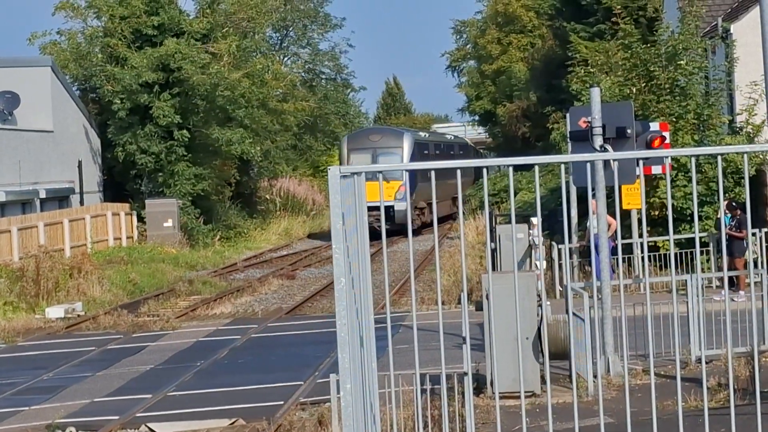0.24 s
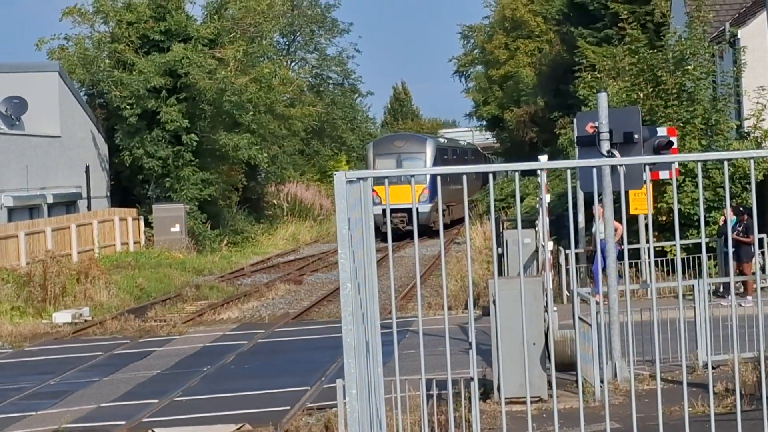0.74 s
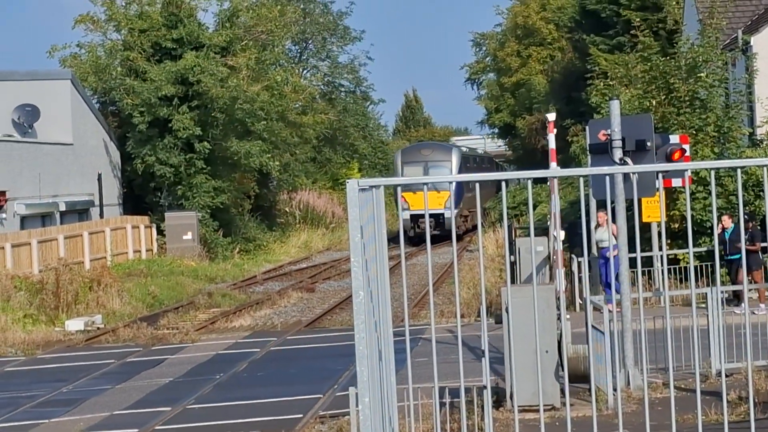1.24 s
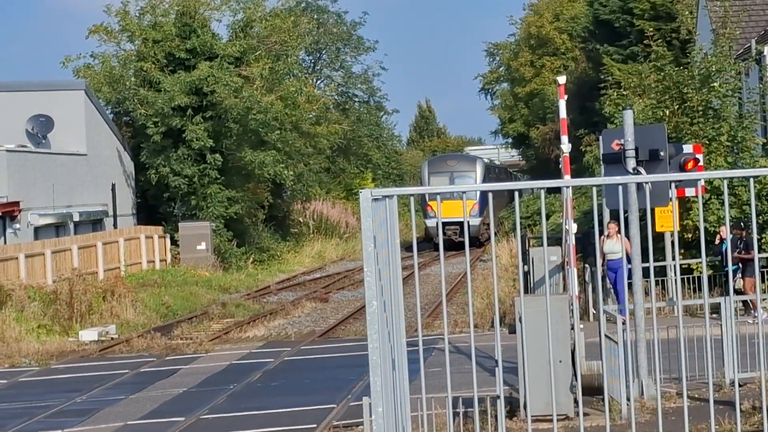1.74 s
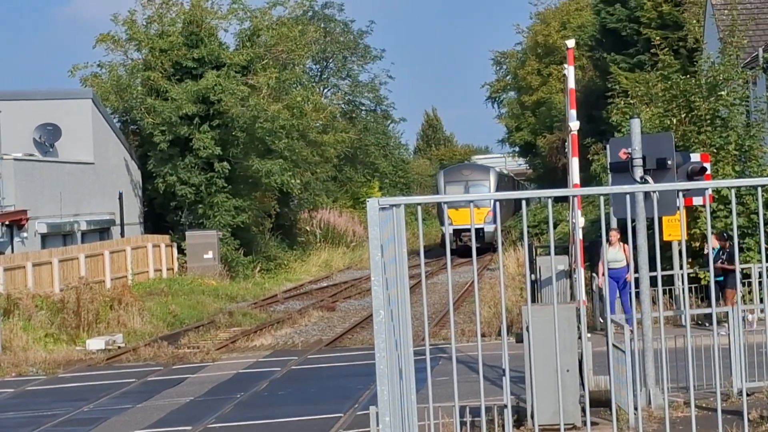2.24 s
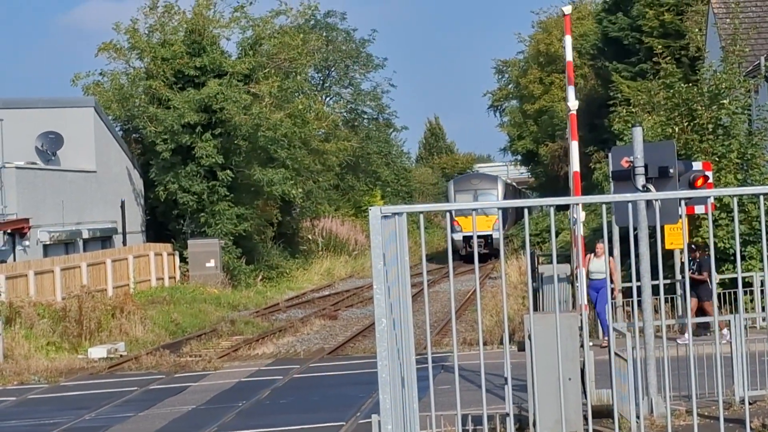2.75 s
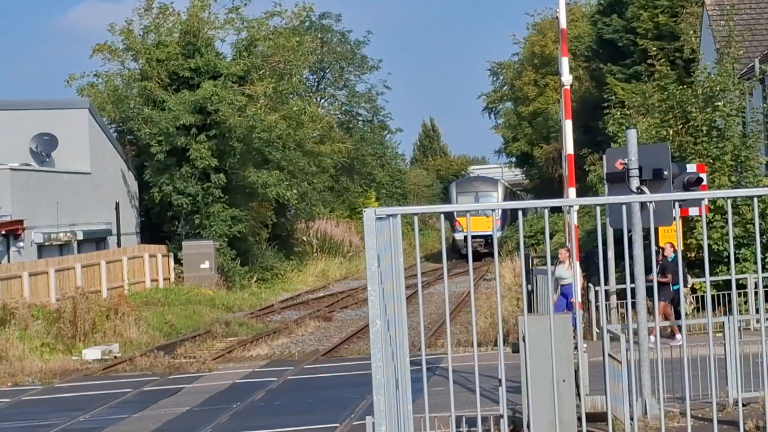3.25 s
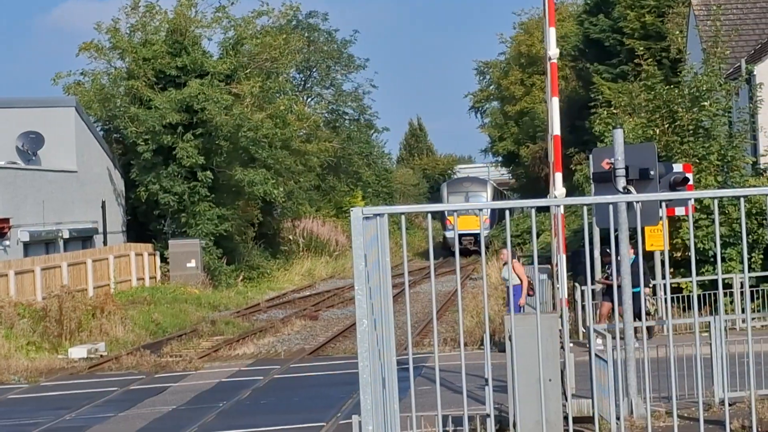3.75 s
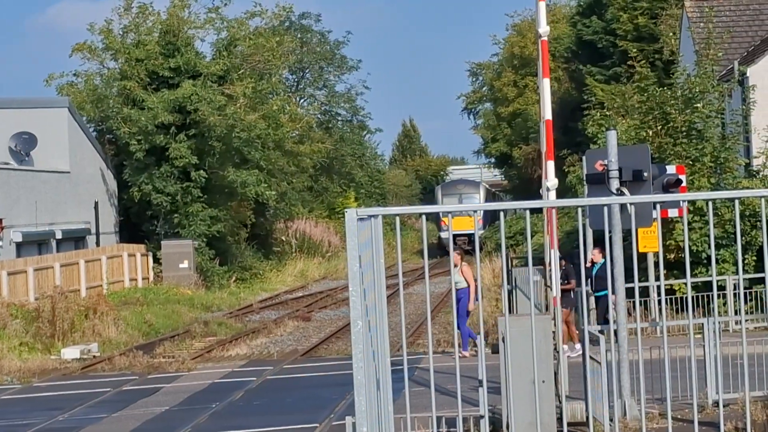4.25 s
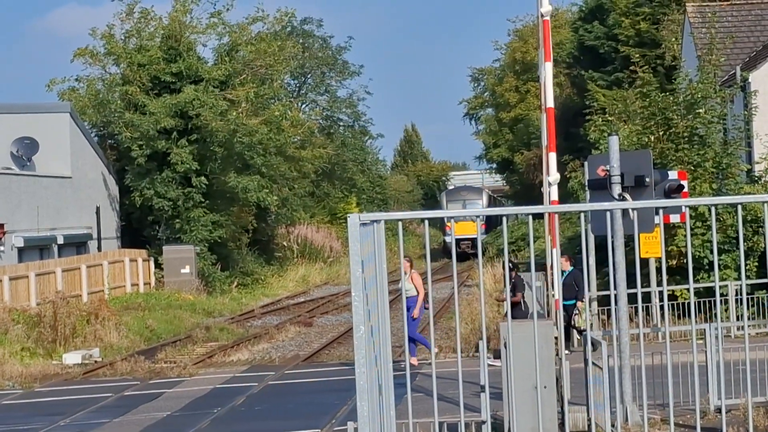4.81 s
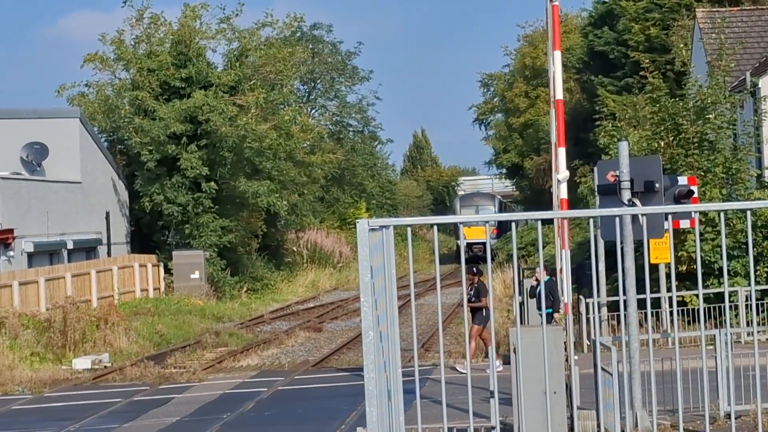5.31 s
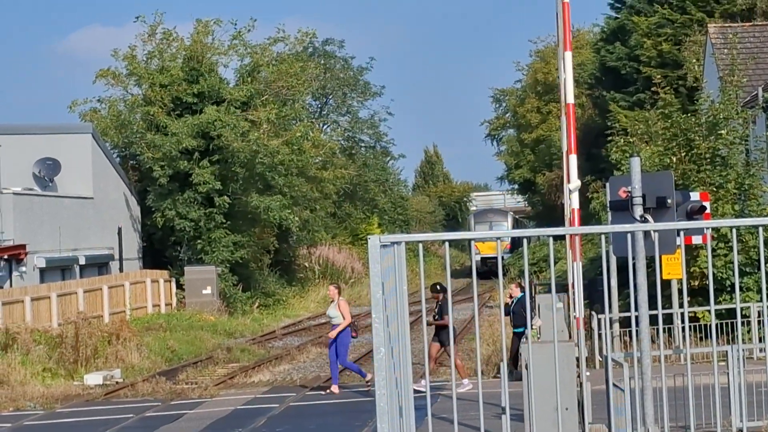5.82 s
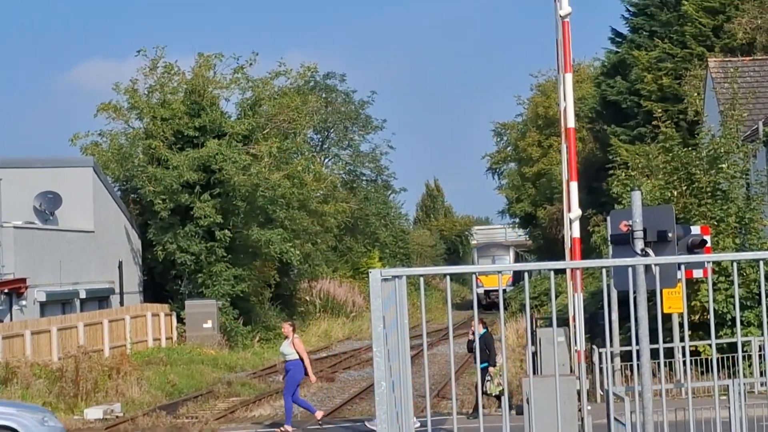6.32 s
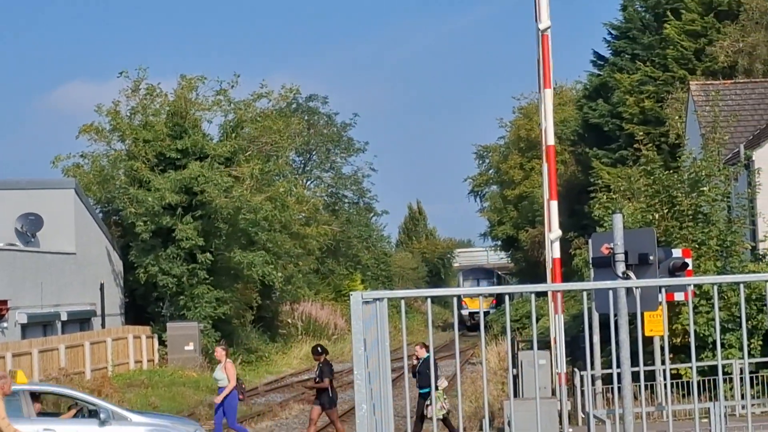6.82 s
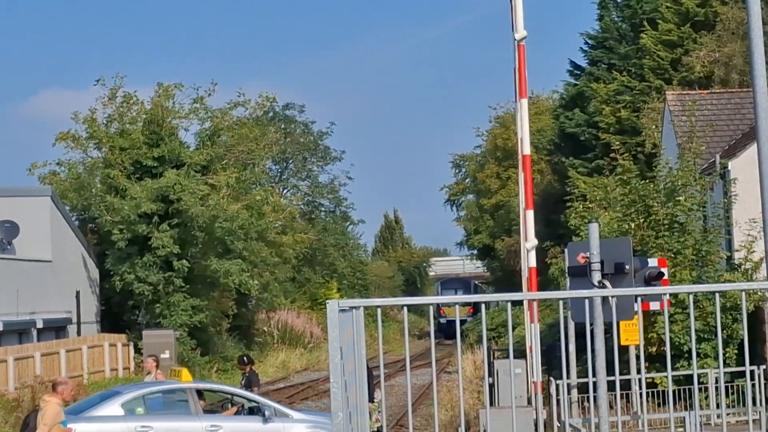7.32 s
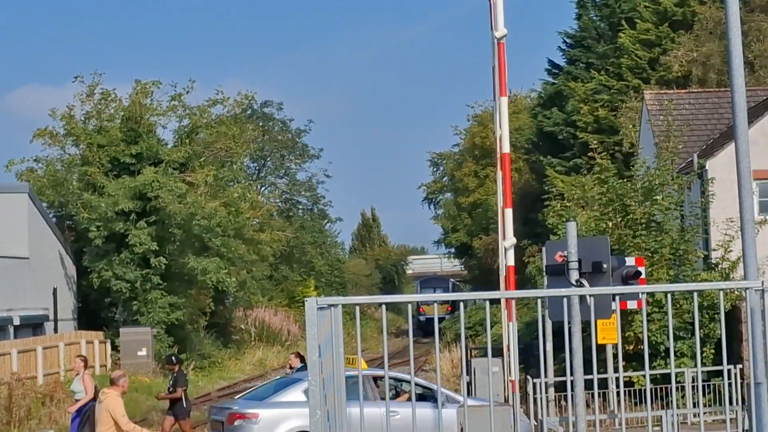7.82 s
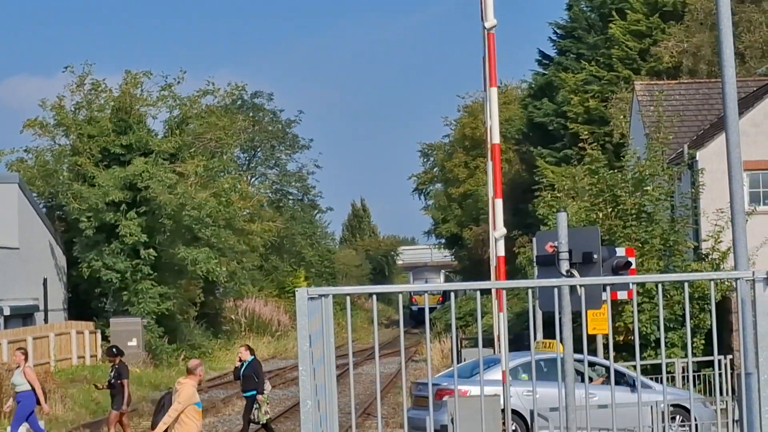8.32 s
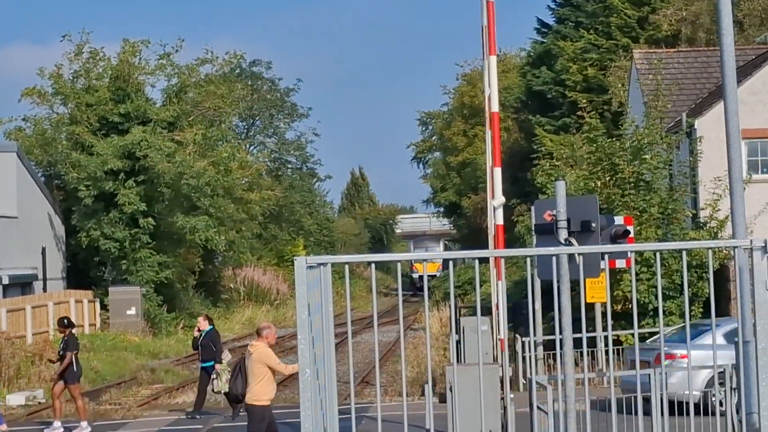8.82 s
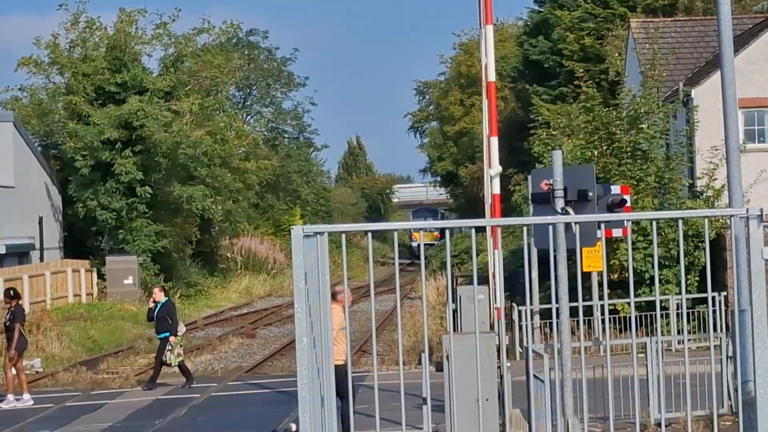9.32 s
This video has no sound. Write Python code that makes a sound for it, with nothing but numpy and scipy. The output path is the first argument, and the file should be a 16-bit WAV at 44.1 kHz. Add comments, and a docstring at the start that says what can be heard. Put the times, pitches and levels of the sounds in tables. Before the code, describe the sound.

Handheld stereo pickup beside a railway crossing. Strong rumble and metallic knocks come first as the train leaves, followed by a fading, beating engine drone with falling squeaks once per wheel turn. A barrier clinks, air vents shortly, and faint very high squeal flickers. Soft wind thumps fill the middle; later, crunchy footsteps cross and a low car engine rises over steady road-like roar.

```python
"""A diesel train throbs and drones away from a level crossing, its wheels knocking over rail joints, squeaking
once a turn and squealing far up; chirps, one vent of air, scuffing walkers, a barrier clink, a bird, wind puffs,
a thin whine and a car join in. Engines are fluttering sine orders; roar, air and grit are coloured noise;
blows are decaying bursts of noise, some through resonances; squeaks, chirps and bird are gliding sines.
Two microphone ports hear most sources a moment apart."""
import sys
import numpy as np
from scipy import signal
from scipy.fft import rfft, irfft, next_fast_len
from scipy.io import wavfile
from scipy.ndimage import uniform_filter1d, map_coordinates

SR = 44100
rng = np.random.default_rng(int(sys.argv[2]) if len(sys.argv) > 2 else 0)


def generate_wav(signal):
    """Clip the signal to [-1, 1] and save it as 16-bit WAV at the path in sys.argv[1]."""
    frames = np.transpose(np.atleast_2d(signal))
    scaled = np.clip(frames, -1, 1) * 32767
    pcm = np.round(scaled).astype(np.int16)
    wavfile.write(sys.argv[1], SR, pcm)


N = 421578

# colour of loose grit, in shoe scuffs and in the barrier's rattle: (frequency [Hz], relative density [dB])
GRIT_COLOUR = [(1760, -24), (3000, -16), (3300, -7), (4240, -2), (11700, -3), (15600, -6.5)]


def amp(db):
    """Decibels to linear gain."""
    return 10 ** (np.asarray(db) / 20)


def unit(x):
    """Scale to an rms of 1."""
    return x / np.sqrt(np.mean(x ** 2) + 1e-20)


def along(points, hz):
    """Read (Hz, value) points at hz, in straight lines on a log frequency axis."""
    point_hz, value = np.transpose(points)
    return np.interp(np.log(hz + 1), np.log(point_hz + 1), value)


def curves(rows):
    """One value per sample for each column after the time."""
    s, *columns = np.transpose(rows)
    return [np.interp(np.arange(N) / SR, s, column) for column in columns]


def gate(rows, fade_s):
    """1 while a table lasts, with short fades inside its ends."""
    t = np.arange(N) / SR
    to_nearest_end = np.minimum(t - rows[0][0], rows[-1][0] - t)
    return np.clip(to_nearest_end / fade_s, 0, 1)


def wobble(rate):
    """A random curve: straight lines between normal random knots, rate of them a second."""
    knots = rng.standard_normal(int(N * rate / SR) + 4)
    return map_coordinates(knots, [np.arange(N) * rate / SR], order=1)


def filtered(x, response):
    """x with its spectrum multiplied by a response of frequency."""
    m = next_fast_len(N + 8192)
    hz = np.fft.rfftfreq(m, 1 / SR)
    return irfft(rfft(x, m) * response(hz), m)[..., :N]


def noise(colour, patchy_db=0):
    """Three unrelated noises of one colour, sharing patches of random gain in time and frequency."""
    z = signal.stft(rng.standard_normal((3, N)), nperseg=512)[2]
    patches = uniform_filter1d(rng.standard_normal(z.shape[1:]), size=5, axis=0)
    patches = uniform_filter1d(patches, size=10, axis=1)
    patchy = signal.istft(z * amp(patchy_db * unit(patches)), nperseg=512)[1][:, :N]
    return unit(filtered(patchy, lambda hz: amp(along(colour, hz))))


def ringing(modes):
    """Three unrelated noises, rms 1, heard through (Hz, width in Hz, dB) resonances."""
    def response(f):
        return sum(amp(db) * 1j * f * width / (centre * centre - f * f + 1j * f * width)
                   for centre, width, db in modes)
    return unit(filtered(rng.standard_normal((3, N)), response))


def tones(hz, spread_hz, rate):
    """Three sines of rms 1 whose pitch flutters, each its own way."""
    drift = np.array([wobble(rate) for _ in range(3)])
    cycles = np.cumsum(hz + spread_hz * drift, axis=1) / SR
    return np.sqrt(2) * np.sin(2 * np.pi * (cycles + rng.random((3, 1))))


def bursts(times, levels_db, t60s, rise_s):
    """Envelope of blows: a quick rise, then an even decay in dB, for up to half a second each."""
    shape, t = np.zeros(N + SR), np.arange(SR // 2) / SR
    for s, db, t60 in np.broadcast(times, levels_db, t60s):
        decay = amp(db - 60 * t / np.clip(t60, .02, 1))
        shape[round(s * SR):][:len(t)] += decay * (1 - np.exp(-t / rise_s))
    return shape[:N]


def glides(notes, sink, stutter, flutter_hz, edge_s):
    """Notes that slide along sink(0-1), fade, and carry a weak octave; all three channels alike."""
    fade_db_per_s, fade_power = 22, 3  # the longer a note lasts, the more it has lost at its end
    out = np.zeros(N)
    for s, length, from_hz, to_hz, db in notes:
        a, b = round(s * SR), min(round((s + length) * SR), N)
        u = np.linspace(0, 1, b - a)
        hz = from_hz + (to_hz - from_hz) * sink(u) + flutter_hz[a:b]
        turn = 2 * np.pi * np.cumsum(hz) / SR
        edges = np.clip(np.minimum(u, 1 - u) * length / edge_s, 0, 1)
        shape = amp(db - fade_db_per_s * length * u ** fade_power) * edges * stutter[a:b]
        out[a:b] += np.sqrt(2) * shape * (np.sin(turn) + amp(-27) * np.sin(2 * turn))
    return np.array([out, out, out])


def straight(u):
    """An even slide from the first pitch to the last."""
    return u


def ports(trio, lag_ms, scattered, pan_db=0):
    """Direct sound reaches the left port earlier by the lag; the scattered share differs from port to port."""
    share = np.clip(scattered, 0, 1)

    def lead_and_lag(hz):
        return np.exp(1j * np.pi * hz * lag_ms / 1000 * np.array([[1], [-1]]))
    pair = np.sqrt(1 - share) * filtered(trio[0], lead_and_lag) + np.sqrt(share) * trio[1:]
    return pair * amp([[pan_db / 2], [-pan_db / 2]])


def engines():
    """Exhaust note of two engines with its octave; their pitch gap makes it beat ever faster."""
    # (time [s], firing rate [Hz], level [dB])
    exhaust_note = [(0.0, 55.1, -25), (1.0, 56.74, -29.5), (1.7, 57.8, -26.5), (2.1, 59.5, -38),
                    (2.7, 60.93, -31), (3.7, 61.05, -44), (4.9, 62.93, -31.5), (5.45, 59.8, -29.5),
                    (5.95, 67.6, -32), (6.3, 71, -31.5), (6.6, 71.4, -65)]
    gap_hz, gap_growth_hz_per_s = 2.08, 0.0667
    cancel_s, depth = 0.452, 0.99  # a moment when the two cancel, and how fully
    hz, db = curves(exhaust_note)
    t = np.arange(N) / SR - cancel_s
    beat_cycles = gap_hz * t + gap_growth_hz_per_s * t ** 2 / 2
    beat = np.abs(1 - depth * np.exp(2j * np.pi * beat_cycles)) / (1 + depth)
    note = tones(hz, spread_hz=1.65, rate=6) + amp(-14.5) * tones(2 * hz, spread_hz=3.26, rate=8)
    return ports(amp(db) * beat * gate(exhaust_note, 0.032) * note, -1.3, 0.11, 0.48)


def drives():
    """Two harmonic drones a little apart in shaft speed; the level of each order throbs."""
    # one list for each drive: (time [s], shaft speed [Hz], level [dB])
    drive_runs = [
        [(0.0, 54.5, -46.5), (0.36, 55.5, -35.5), (0.45, 58, -48), (0.76, 70, -51), (0.85, 70, -38),
         (0.94, 65.5, -45.5), (1.02, 64, -36.5), (1.12, 62.4, -40), (1.45, 65.5, -37), (1.9, 63.6, -39),
         (2.7, 63.1, -41.5), (3.3, 62.9, -49), (4.6, 62.2, -45), (5.3, 61.7, -42), (5.7, 59, -43.5),
         (6.0, 58.5, -52), (6.9, 58, -53)],
        [(0.4, 61.5, -42), (0.55, 62.8, -36.5), (0.74, 62.5, -40), (0.9, 60.8, -45), (1.3, 60.4, -47),
         (2.1, 59.56, -44.5), (2.9, 58.89, -44.5), (3.6, 58.4, -62), (4.8, 57.86, -49), (5.9, 56.8, -42.5),
         (6.95, 55.8, -56)],
    ]
    # (multiple of shaft speed, level in the first drive [dB], level in the second [dB])
    drone_orders = [(2, -16, -5.5), (3, -8.5, -16), (4, -8.5, -18), (5, 0.5, -2), (6, -15.5, -20)]
    out = 0
    for which, rows in enumerate(drive_runs):
        shaft_hz, db = curves(rows)
        orders = 0
        for k, *levels in drone_orders:
            throb = amp(levels[which] + 3.16 * wobble(16))
            orders = orders + throb * tones(k * shaft_hz, spread_hz=1.2, rate=25)
        out = out + amp(db) * gate(rows, 0.025) * orders
    return ports(out, 0.052, 0.15, 0.89)


def rolling():
    """Noise of rolling: low rumble in lumps, the train's roar from ahead, the road's from the side, far hiss."""
    # (time [s], rumble level [dB], train roar level [dB], road roar level [dB], hiss level [dB])
    roll_levels = [(0.0, -26.5, -43, -45, -53.5), (1.13, -37, -45.5, -51.5, -57),
                   (1.66, -34.5, -45.5, -49.5, -55.5), (2.37, -37.5, -46.5, -52, -57),
                   (2.9, -35, -47.5, -49, -53.5), (4.25, -38, -48, -51, -56), (4.76, -34, -48, -49, -52.5),
                   (5.15, -38, -46.5, -46.5, -49), (6.05, -35, -47, -51, -53), (6.79, -37.5, -47, -48, -52),
                   (7.7, -38.5, -44.5, -46.5, -52.5), (8.58, -38, -42.5, -46, -53.5),
                   (8.97, -35.5, -41.5, -46.5, -56), (9.56, -34.5, -43, -48.5, -57)]
    # colours of the four layers: (frequency [Hz], relative density [dB])
    rumble_colour = [(15, -46), (28, -14), (70, -1), (150, -7.5), (290, -11), (360, -26), (500, -74)]
    train_colour = [(200, -46), (330, -1.5), (420, 1.5), (520, -5), (750, -1), (930, -10.5), (1200, -17),
                    (2200, -23), (4500, -33), (9000, -63)]
    road_colour = [(600, -8.5), (1100, 3), (1600, 1), (2050, 3.5), (2600, -3), (3200, -20.5), (4400, -15),
                   (8000, -23), (12000, -49)]
    hiss_colour = [(1760, -8), (3000, -1), (4060, -6.5), (5390, -7), (6820, -13), (9820, -17.5),
                   (15600, -15.5)]
    rumble_db, train_db, road_db, hiss_db = curves(roll_levels)
    lumps_db = 2.86 * wobble(14) + 0.88 * wobble(4.7)
    rumble = amp(rumble_db + lumps_db) * noise(rumble_colour, patchy_db=0.5)
    train = amp(train_db + .7 * wobble(8)) * noise(train_colour, patchy_db=1.93)
    road = amp(road_db + .7 * wobble(8)) * noise(road_colour, patchy_db=1.6)
    hiss = amp(hiss_db) * noise(hiss_colour, patchy_db=2.0)
    near = ports(rumble, 0.031, 0.2) + ports(train, 0.11, 0.24) + ports(road, 0.48, 0.26)
    return near + ports(hiss, 0.311, 1.0)


def joints():
    """Each rail joint gives a dull crash, knocks the sleeper and sets high modes of the rail ringing."""
    # wheels over joints: (time [s], crash level [dB], high ring level [dB], knock level [dB])
    joint_hits = [(0.0294, -45, -60, -58), (0.111, -37, -67, -48), (0.13, -40, -72, -54),
                  (0.152, -32, -75, -60), (0.226, -33, -54, -37.5), (0.265, -50, -71, -47),
                  (0.566, -27, -47, -32), (0.594, -41, -58, -42), (1.48, -37, -73, -46),
                  (1.908, -51, -80, -39), (1.987, -41, -79, -63), (2.3494, -42, -72, -52),
                  (3.243, -44, -67, -59), (3.7494, -52, -69, -41.5), (4.0498, -48.5, -77, -42)]
    # colour of the crash: (frequency [Hz], relative density [dB])
    crash_colour = [(88, -20), (150, -4), (657, -3), (1050, -15), (2110, -1.5), (3360, -11), (9970, -42),
                    (11200, -60), (13600, -42), (15600, -68)]
    # resonances of the sleeper, the rail, and the last bogie grinding over the points:
    # (frequency [Hz], width [Hz], relative level [dB])
    sleeper_modes = [(665, 54, 6), (776, 60, -1.5), (1210, 93, -6), (2130, 110, -17)]
    rail_modes = [(10000, 250, 1), (13300, 300, -4), (6900, 160, -15)]
    scrape_modes = [(1300, 400, -5), (2100, 500, 0), (2750, 250, -2), (3850, 400, -9)]
    crash_t60_s, knock_t60_s, ring_t60_s, scrape_t60_s = 0.19, 0.42, 0.53, 0.48
    s, crash_db, ring_db, knock_db = np.transpose(joint_hits)
    clatter = amp(2.5 * wobble(700) + .8 * wobble(130))
    crash = bursts(s, crash_db, crash_t60_s, 0.0019) * clatter * noise(crash_colour, patchy_db=1.0)
    knock = bursts(s, knock_db, knock_t60_s, 0.0025) * ringing(sleeper_modes)
    ring = bursts(s, ring_db, ring_t60_s, 0.021) * ringing(rail_modes)
    grind = bursts(0.11, -35, scrape_t60_s, 0.052) * clatter * amp(2.5 * wobble(94))
    return ports(crash + knock + ring + grind * ringing(scrape_modes), 0.14, 0.4)


def squeaks():
    """Stick-slip tones, once a wheel turn, that jump between rings of the wheel, sink and stutter."""
    # (start [s], length [s], first pitch [Hz], last pitch [Hz], level [dB], level of the catch before it [dB],
    #  tail length [s], tail first pitch [Hz], tail last pitch [Hz], tail level [dB])
    wheel_squeaks = [(0.714, 0.418, 4960, 4480, -47, -48.5, 0.03, 3950, 3780, -58),
                     (1.97, 0.425, 4950, 4520, -49.5, -48.5, .035, 3960, 3820, -60),
                     (3.449, 0.19, 4800, 4580, -47.5, -47.5, 0.19, 4680, 3800, -57),
                     (4.853, 0.31, 4900, 4650, -51, -46, .076, 4087, 3950, -53.5),
                     (6.02, 0.39, 4960, 4680, -54, -52, .05, 4040, 3850, -54),
                     (7.542, 0.18, 4920, 4800, -50, -53, .19, 4230, 4000, -56),
                     (9.173, .26, 4740, 4500, -52.5, -58, 0.1, 3980, 3846, -58)]
    # lowest ring of the wheel: (start [s], length [s], level [dB])
    low_rings = [(0.11, 0.051, -46), (0.62, 0.11, -52), (1.826, 0.125, -53), (3.33, 0.096, -59)]
    low_hz = 2830
    catch_s, catch_hz, catch_rise_hz = .04, 4150, 130  # a lower ring catches just before
    tail_gap_s, edge_s = .012, .007  # another lower ring ends it after the gap
    even_share, drop_power = 0.49, 6.3  # this share of the sinking is even, the rest drops at the end

    def late_drop(u):
        return even_share * u + (1 - even_share) * u ** drop_power

    short = [(s, length, low_hz, low_hz, db) for s, length, db in low_rings]
    for s, length, _, _, _, catch_db, tail_s, tail_from_hz, tail_to_hz, tail_db in wheel_squeaks:
        short.append((s - catch_s, catch_s, catch_hz, catch_hz + catch_rise_hz, catch_db))
        short.append((s + length + tail_gap_s, tail_s, tail_from_hz, tail_to_hz, tail_db))
    slip = wobble(70)
    dropout_db = np.linspace(6, 11, N) * np.clip(-slip - .6, 0, 2)  # brief drop-outs that deepen with time
    flutter_hz = 34 * wobble(350)
    main_notes = [row[:5] for row in wheel_squeaks]
    held = glides(main_notes, late_drop, amp(2.5 * slip - dropout_db), flutter_hz, edge_s)
    jumps = glides(short, straight, amp(2.7 * slip), flutter_hz, edge_s)
    return ports(held + jumps, 0.071, 0, -1.4)


def chirps():
    """Short rough whistles from the valve and brake gear: sliding sines that stutter and flutter."""
    # (start [s], length [s], first pitch [Hz], last pitch [Hz], level [dB])
    whistles = [(.165, 0.07, 2850, 2800, -49), (.155, .048, 4950, 4900, -53), (.15, .035, 2110, 2050, -43),
                (1.988, .035, 1980, 1965, -48), (1.995, .04, 2620, 2540, -51),
                (2.855, 0.075, 2130, 1930, -46), (2.845, .04, 2480, 2280, -48),
                (2.935, .055, 1740, 1900, -51), (2.97, .055, 2950, 3060, -51),
                (3.038, 0.05, 1960, 1900, -45), (3.228, .03, 1650, 1620, -48), (3.27, .05, 2150, 2020, -52),
                (3.425, 0.045, 1995, 1880, -46.5), (3.42, .035, 1720, 1650, -50)]
    stutter, flutter_hz = amp(2.5 * wobble(120)), 45 * wobble(300)
    return ports(glides(whistles, straight, stutter, flutter_hz, edge_s=0.007), 0.44, 0, -1.7)


def walkers():
    """Shoes on the road: the sole scuffs, then grit crunches under it, over a duller thud."""
    # (time [s], grit level [dB], thud level [dB], thud decay by 60 dB [s])
    footfalls = [(1.0301, -58, -52.5, 0.15), (3.78, -56, -36, 0.087), (6.0377, -57, -42, 0.11),
                 (6.549, -52, -58, 0.09), (6.588, -43, -44, 0.22), (6.6947, -47, -52, 0.12),
                 (6.72, -47, -45.5, 0.13), (6.877, -58.5, -34, 0.061), (7.132, -44.5, -32, 0.27),
                 (7.432, -39, -43, 0.14), (7.865, -63, -39.5, 0.14), (8.124, -40, -48, 0.16),
                 (8.4123, -51, -39, 0.16), (9.1302, -57, -37, 0.23)]
    # colour of the thud: (frequency [Hz], relative density [dB])
    thud_colour = [(400, -27), (750, 14), (1200, -5), (2200, 4.5), (4000, -6.5), (6000, -15.5)]
    scuff_lead_s, scuff_db = 0.061, -12  # the scuff comes ahead of the step, this far under its grit
    s, grit_db, thud_db, t60 = np.transpose(footfalls)
    crunch = amp(6 * wobble(900))
    # grit dies sooner than the thud
    grit = bursts(s, grit_db, 0.84 * t60, .005) * crunch * noise(GRIT_COLOUR, patchy_db=5.0)
    scuff = bursts(s - scuff_lead_s, grit_db + scuff_db, 0.32, 0.02) * crunch * noise(GRIT_COLOUR, patchy_db=4)
    thud = bursts(s, thud_db, t60, 0.0022) * noise(thud_colour)
    return ports(grit + scuff + thud, 0.4, 0.93)


def barrier():
    """A loose bar of the rising barrier clinks once: a short rattle through its modes, with gritty noise."""
    # (frequency [Hz], width [Hz], relative level [dB])
    bar_modes = [(2630, 51, 6), (6410, 59, -2), (7400, 60, -4), (9460, 45, -8)]
    rattle = ringing(bar_modes) + amp(-8) * noise(GRIT_COLOUR)
    clink = bursts([1.575], [-39.5], 0.25, 0.0033)
    return ports(clink * rattle, 0.13, 0.93, -1.1)


def wind():
    """Single pushes of air on the ports, about one low cycle each, and weaker ones at random."""
    # (time [s], peak level [dB])
    pushes = [(2.252, -19.5), (2.899, -21), (3.301, -21), (3.745, -22), (3.818, -23.5), (3.967, -18),
              (4.047, -23), (4.438, -17.5), (4.592, -20), (5.124, -19), (5.404, -20), (7.193, -26),
              (7.257, -28), (7.632, -23)]
    weak_db, base_hz = -28, 74  # middle level of the weak ones; each push scatters around the base pitch
    s, db = np.transpose(pushes)
    chance = rng.random((70, 2))
    s = np.r_[s, 1.8 + 5.9 * chance[:, 0]]
    db = np.r_[db, weak_db - 8 * (chance[:, 1] - .5)]
    out, t = np.zeros((3, N + SR)), np.arange(-SR // 20, SR // 20) / SR
    for at, level, (pitch_chance, *turn) in zip(s, db, rng.random((len(s), 4))):
        f = base_hz * (0.87 + 0.5 * pitch_chance ** 2)
        cycle = np.cos(2 * np.pi * (f * t + np.array(turn)[:, None]))
        push = np.exp(-(t * f / 0.5) ** 2) * cycle
        out[:, round(at * SR) - SR // 20:][:, :len(t)] += amp(level) * push
    return ports(out[:, :N], 0, .46)


def bird():
    """A far bird's faint chips: short sliding sines, most of them falling."""
    # (start [s], length [s], first pitch [Hz], last pitch [Hz], level [dB])
    chips = [(1.825, .016, 6150, 5600, -60), (1.845, .016, 6150, 5650, -60), (1.87, .065, 5700, 5700, -64),
             (4.69, .08, 6450, 5300, -63)]
    stutter, flutter_hz = amp(2 * wobble(90)), 40 * wobble(250)
    return ports(glides(chips, straight, stutter, flutter_hz, edge_s=.004), 0.14, 0)


def vent():
    """A valve lets compressed air out; each resonance of its body flares up in its own time."""
    # resonances of the valve body: (frequency [Hz], width [Hz], relative level [dB])
    valve_modes = [(1820, 95, -11), (2010, 130, -8), (2470, 270, -3), (3005, 130, -11), (3750, 120, -5),
                   (4640, 112, -14), (5540, 300, -4), (6500, 330, -5), (10400, 200, -11.5),
                   (13400, 300, -10)]
    # colour of the rushing air: (frequency [Hz], relative density [dB])
    air_colour = [(530, -42), (900, -10.5), (1630, -10.5), (1950, -2.5), (3340, -14), (6680, -16),
                  (7990, -22.5), (13500, -30), (15600, -26)]
    # short spits after the valve shuts: (time [s], level [dB])
    late_spits = [(3.225, -53), (3.424, -59)]
    open_s, hold_s = 2.825, 0.31
    level_db, sag_db = -43, 1  # pressure sinks by the sag while the valve stays open
    whistle = sum(amp(db + 2.8 * wobble(40)) * ringing([(hz, width, 0)]) for hz, width, db in valve_modes)
    rush = amp(3.5 * wobble(350) + 1.5 * wobble(40)) * noise(air_colour, patchy_db=3.5)
    t = np.arange(N) / SR - open_s
    shut_db = 120 * np.clip(t - hold_s, 0, 1)
    flow = amp(level_db - sag_db * t / hold_s - shut_db) * np.clip(t / 0.024, 0, 1)
    spits = bursts(*np.transpose(late_spits), 0.21, .008) * whistle
    return ports(flow * (rush + amp(-8.5) * whistle) + spits, 0.427, 0.88, -1.04)


def squeal():
    """A flange sings unsteadily in short fits near the top of hearing; the louder, the rougher."""
    # (start [s], hold [s], pitch [Hz], level [dB])
    squeal_fits = [(3.159, 0.14, 14050, -62), (3.3, 0.33, 14030, -57), (3.88, .025, 14030, -50),
                   (4.1, 0.1, 14200, -64), (4.24, .05, 14080, -62), (4.43, 0.08, 14000, -60),
                   (4.7, 0.07, 14100, -61), (5.045, .008, 14000, -55), (5.5, 0.094, 14030, -51),
                   (7.295, .01, 14150, -66), (8.02, .07, 13950, -68)]
    rise_s, fall_s = 0.042, 0.075  # time for 20 dB up and down
    sag_hz_per_s = 300
    t = np.arange(N) / SR
    s, hold, hz, db = np.transpose(squeal_fits)[:, :, None]
    rise_db = 20 * np.clip(s - t, 0, 1) / rise_s
    fall_db = 20 * np.clip(t - s - hold, 0, 1) / fall_s
    fits = amp(db - rise_db - fall_db)
    gain = fits.sum(axis=0)
    # the louder fit pulls the pitch its way
    pitch = (fits * (hz - sag_hz_per_s * np.clip(t - s, 0, 1))).sum(axis=0) / gain
    spread_hz = 55 + 90 * gain / gain.max()
    chatter = amp(5 * wobble(50))
    return ports(gain * chatter * tones(pitch, spread_hz, rate=200), 0.12, 0.25, 3.4)


def whine():
    """A faint, thin, narrow tone that wavers in pitch and flickers in level."""
    # (time [s], level [dB])
    whine_levels = [(3.3, -69), (4.08, -60.5), (4.25, -70), (4.65, -65), (5.2, -77), (6.5, -69), (6.6, -62),
                    (7.03, -57), (7.15, -76), (9.56, -76)]
    flicker = amp(3.5 * wobble(45))
    tone = flicker * tones(np.full(N, 4310.), spread_hz=130, rate=300)
    return ports(amp(curves(whine_levels)[0]) * gate(whine_levels, .1) * tone, 0.28, 0.51)


def car():
    """Low orders of a car engine, fluttering sines at multiples of its shaft speed."""
    # (time [s], shaft speed [Hz], level [dB])
    car_run = [(7.5, 27.5, -49), (7.7, 27.03, -38), (7.95, 26.38, -41), (8.15, 26.49, -54),
               (8.45, 26.7, -47), (8.6, 26.92, -37.5), (9.2, 28.1, -34.5), (9.56, 27.9, -42)]
    # (multiple of shaft speed, relative level [dB])
    car_orders = [(2, -5.5), (3, -2.5), (4, -3.5), (6, -9.5), (8, -11)]
    hz, db = curves(car_run)
    orders = sum(amp(level + 1.3 * wobble(8.4)) * tones(k * hz, spread_hz=1.553, rate=8)
                 for k, level in car_orders)
    return ports(amp(db) * gate(car_run, 0.076) * orders, -0.21, 0.058, 0.77)


def scene():
    """The train's own sounds, then everything around it."""
    train = engines() + drives() + rolling() + joints() + squeaks() + chirps() + vent() + squeal()
    around = walkers() + barrier() + wind() + bird() + whine() + car()
    return train + around


def record(dry):
    """Keep only what lies below a sharp band limit at 15750 Hz."""
    return filtered(dry, lambda hz: hz < 15750)


dry = scene()
out = record(dry)
generate_wav(out)
```